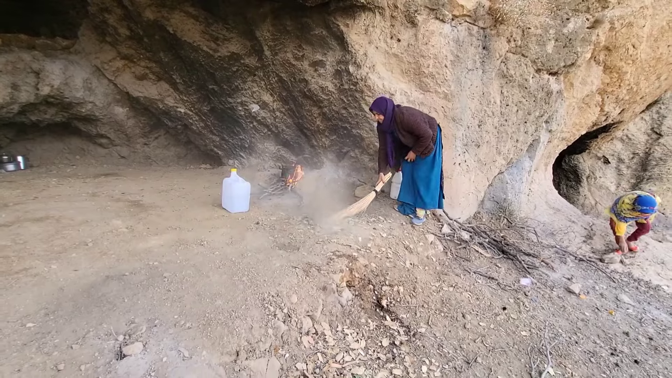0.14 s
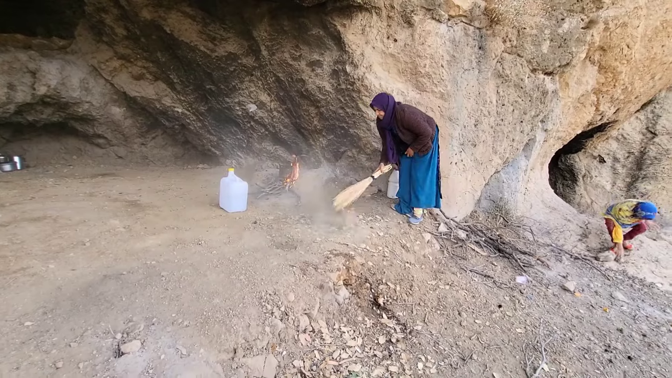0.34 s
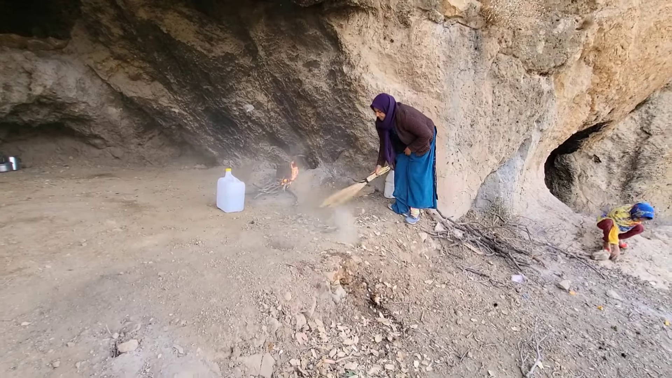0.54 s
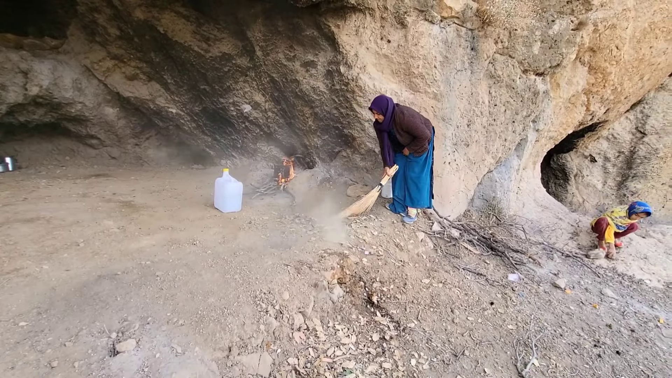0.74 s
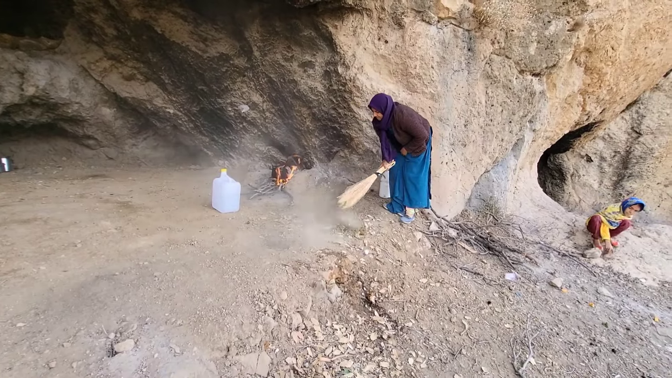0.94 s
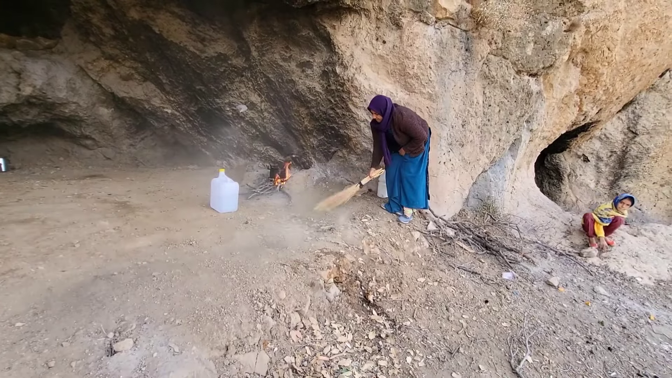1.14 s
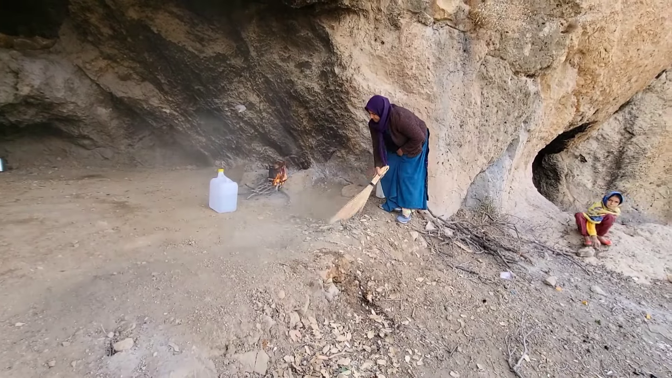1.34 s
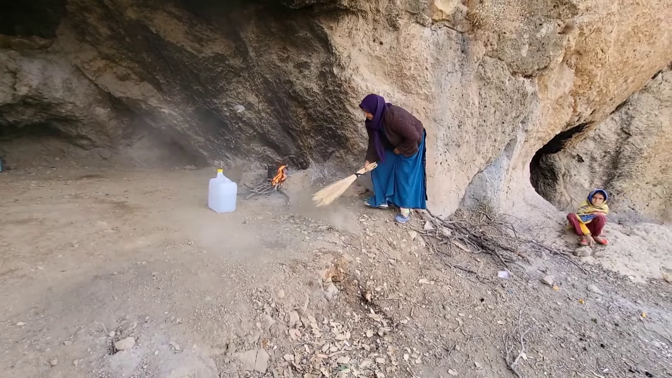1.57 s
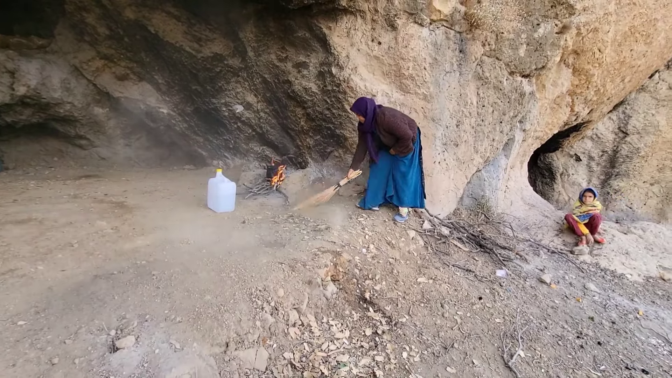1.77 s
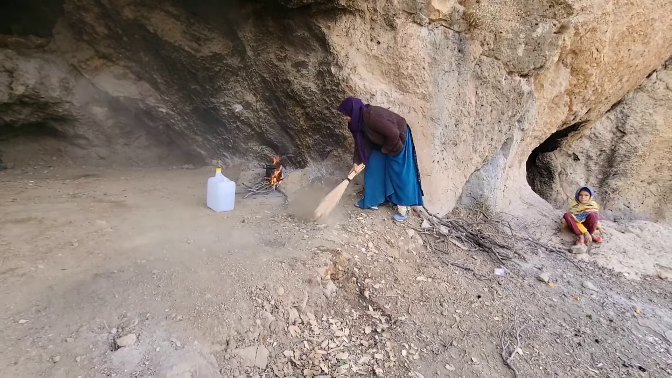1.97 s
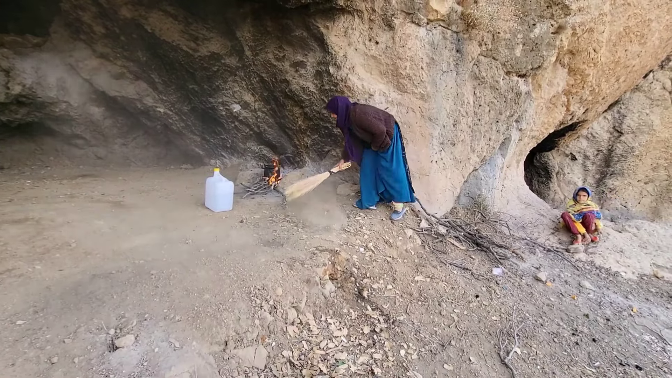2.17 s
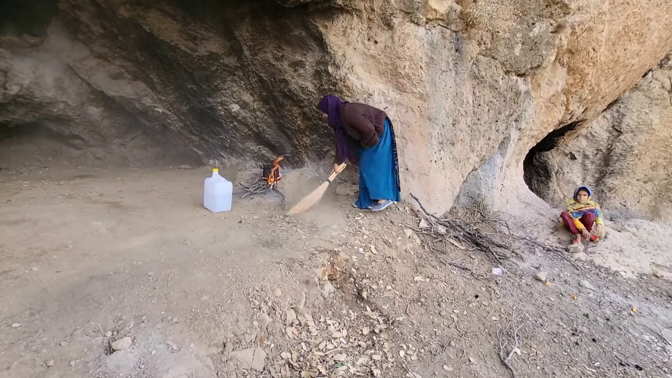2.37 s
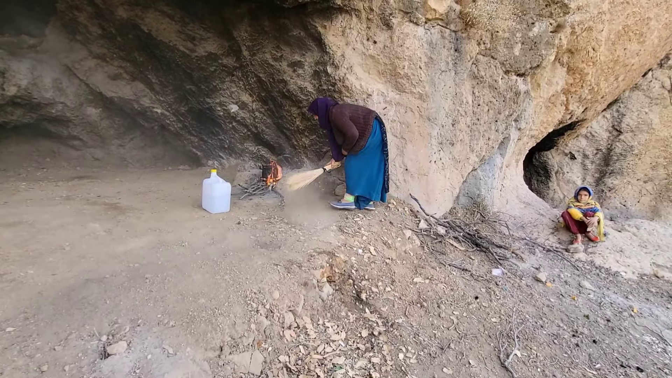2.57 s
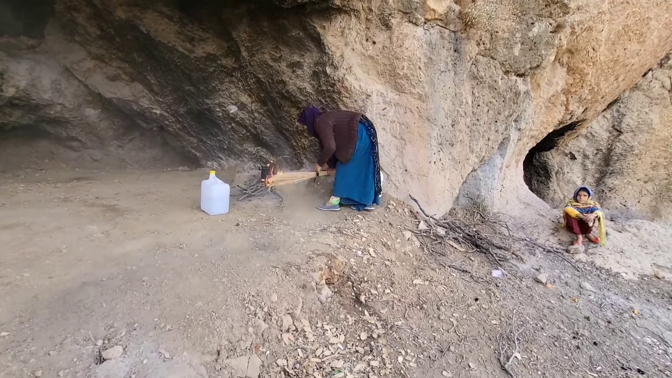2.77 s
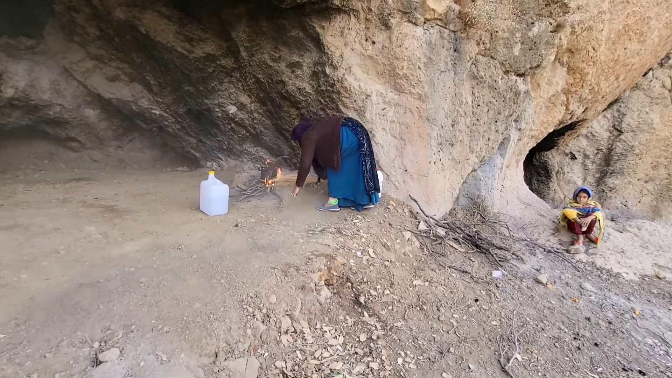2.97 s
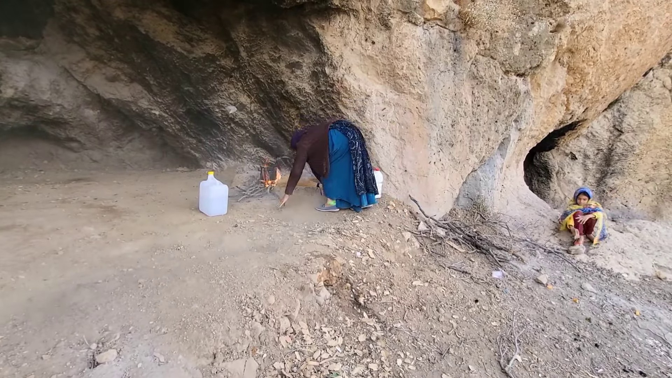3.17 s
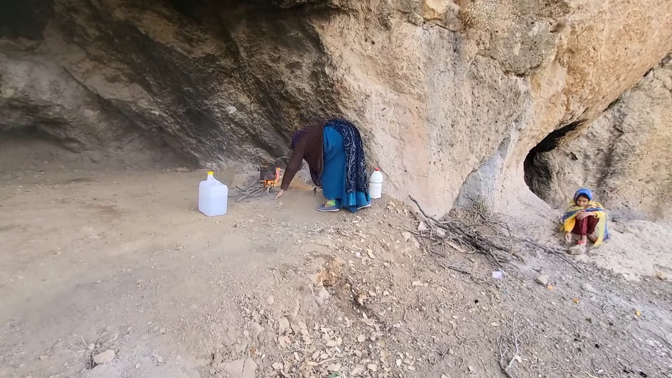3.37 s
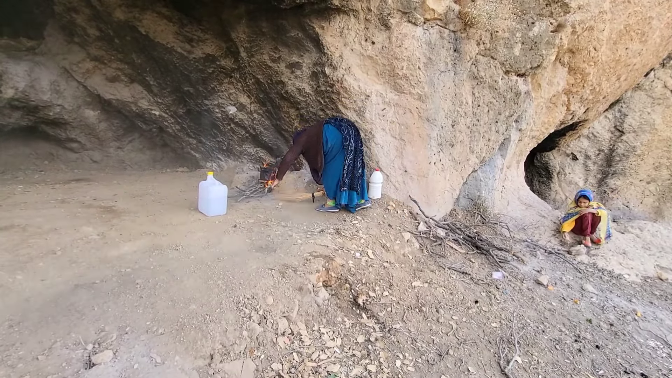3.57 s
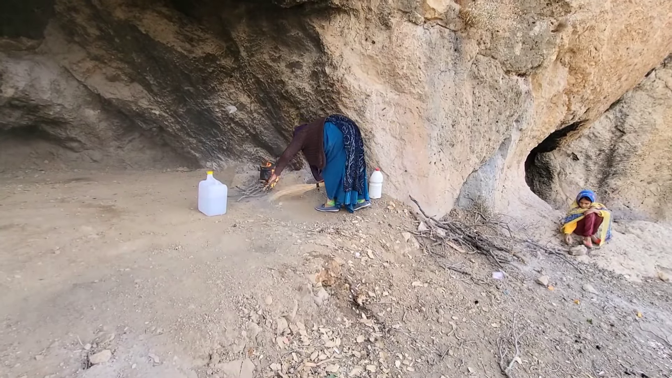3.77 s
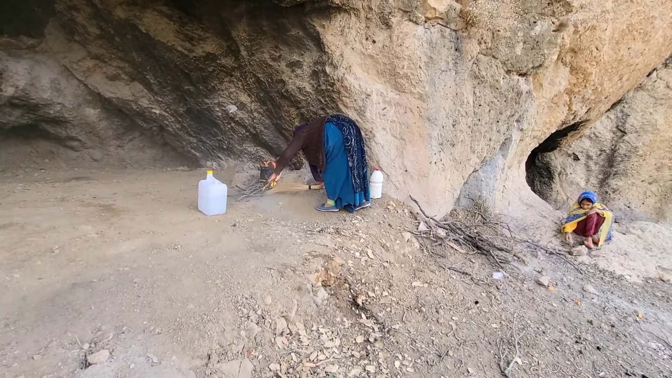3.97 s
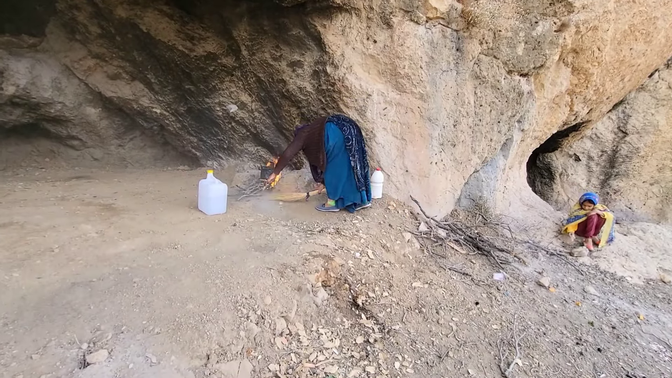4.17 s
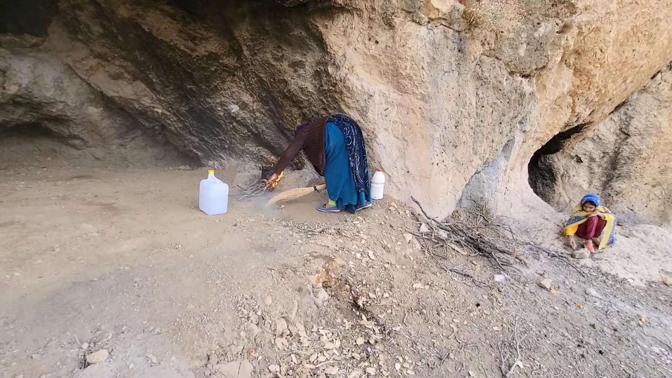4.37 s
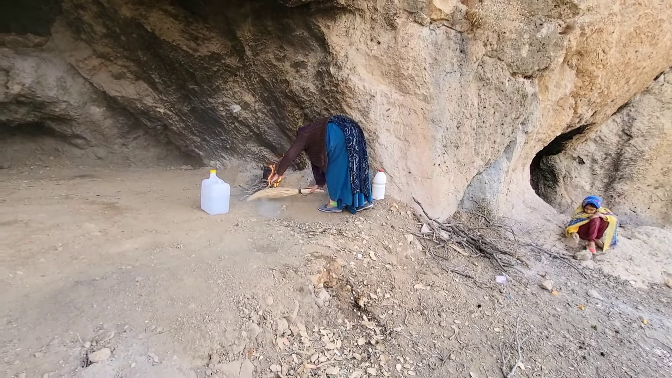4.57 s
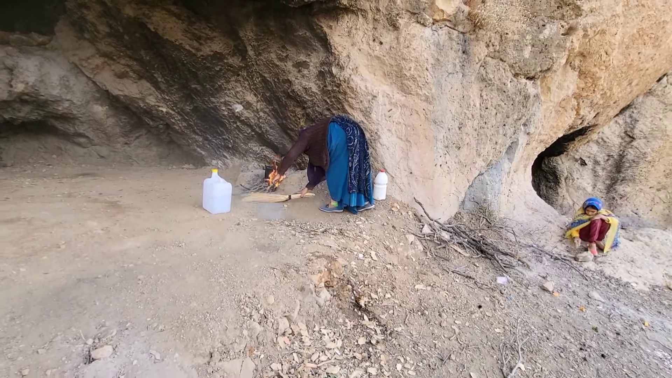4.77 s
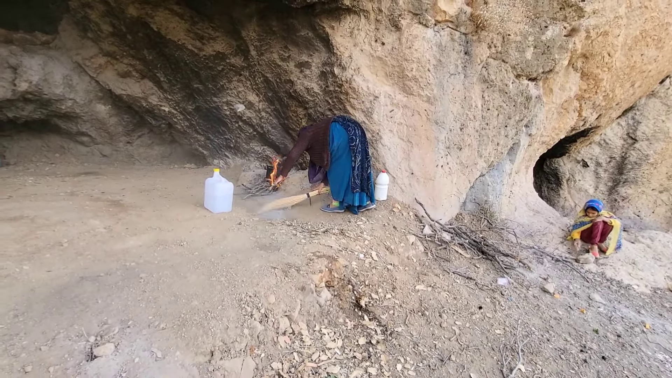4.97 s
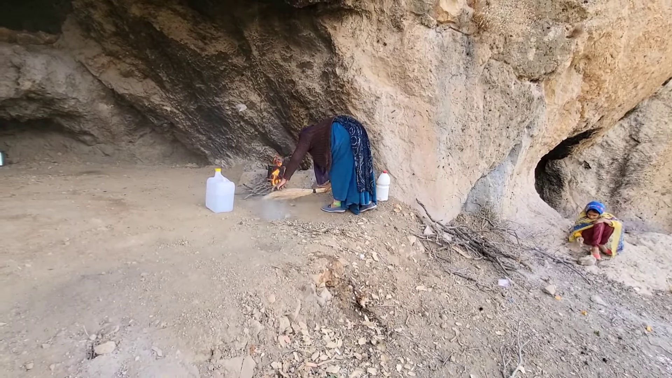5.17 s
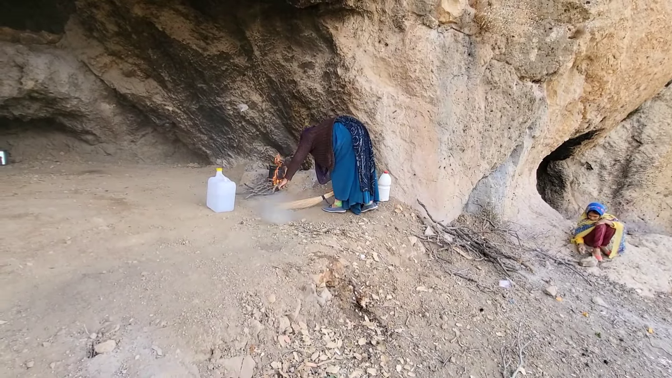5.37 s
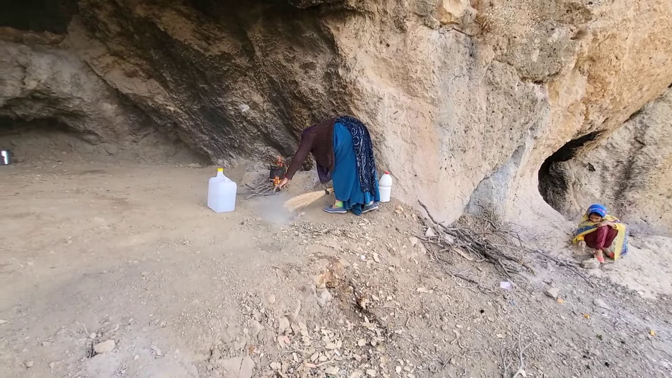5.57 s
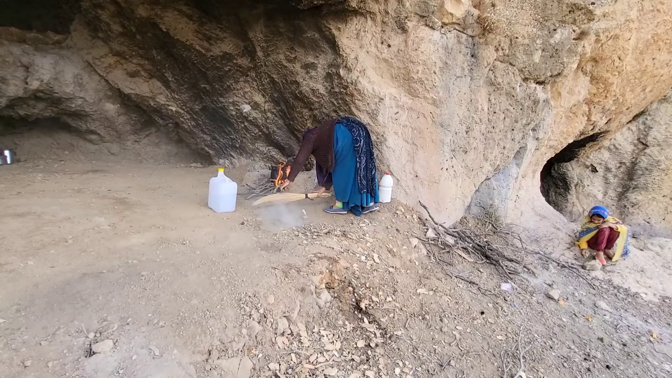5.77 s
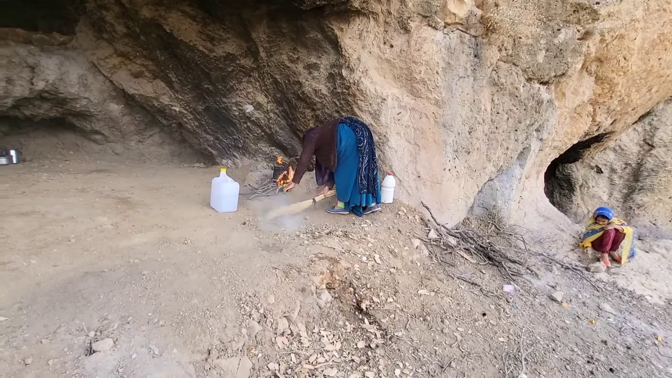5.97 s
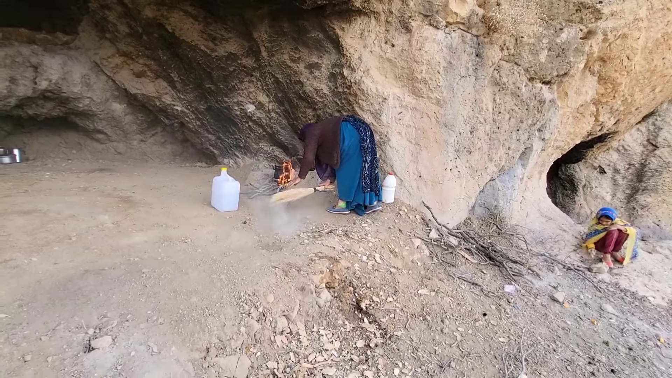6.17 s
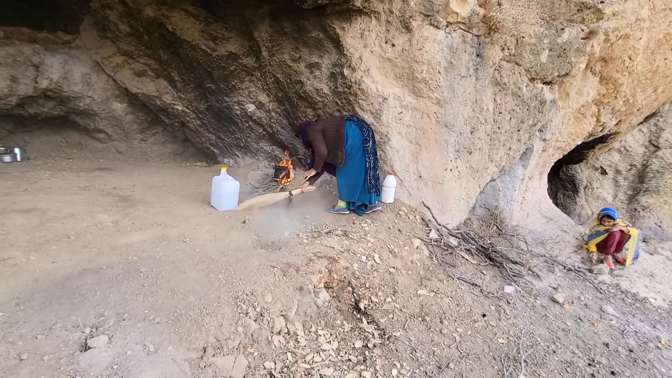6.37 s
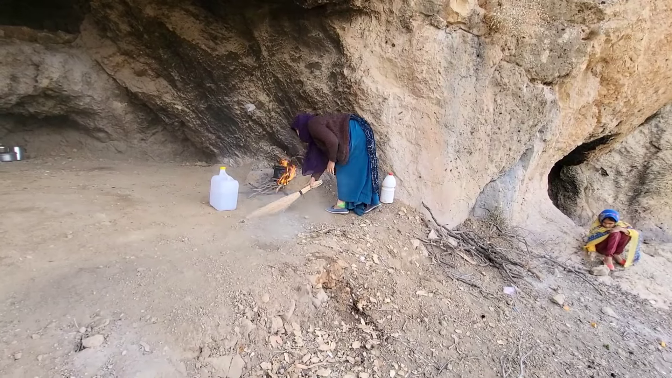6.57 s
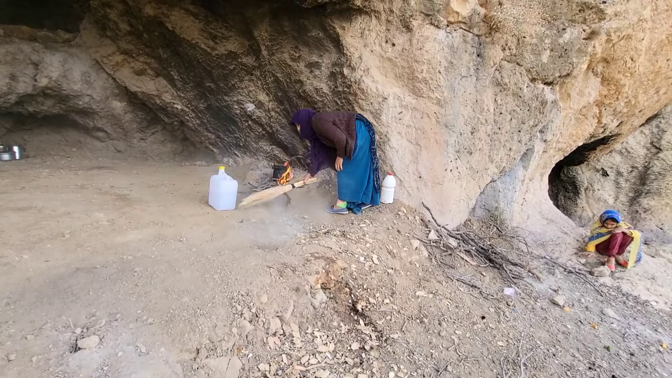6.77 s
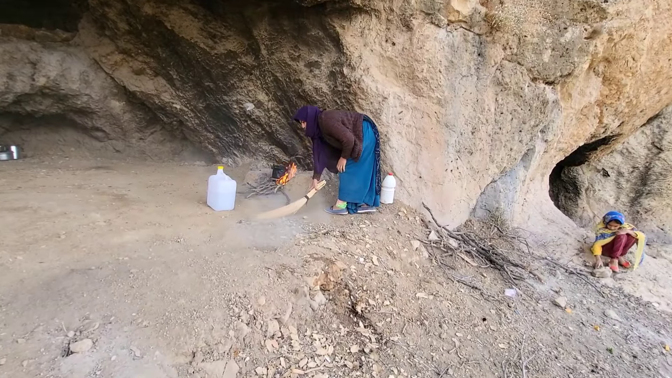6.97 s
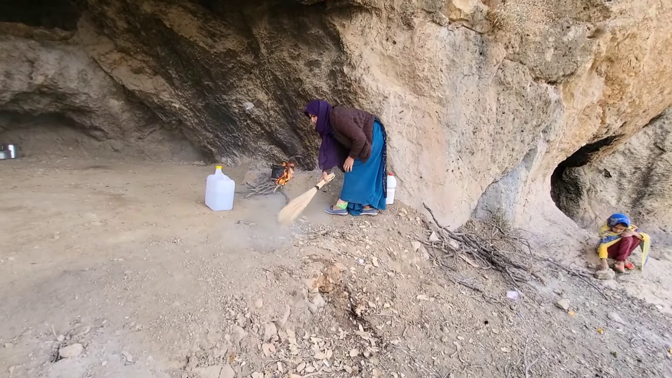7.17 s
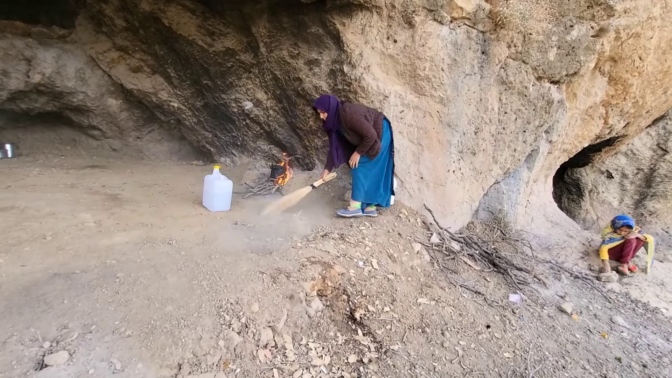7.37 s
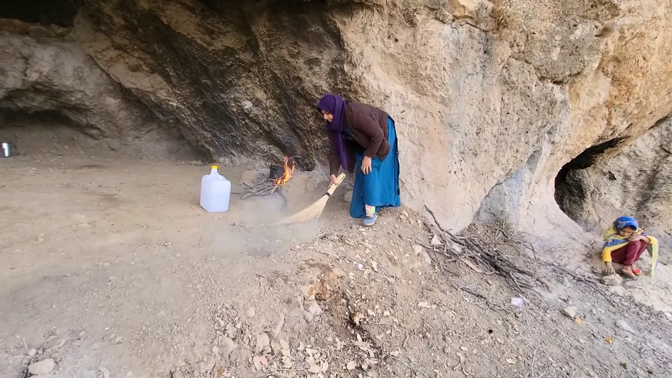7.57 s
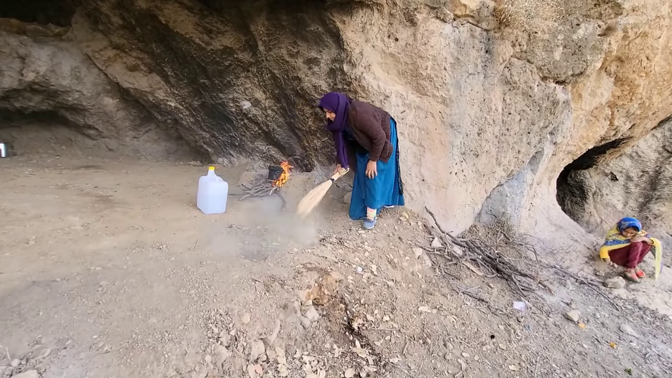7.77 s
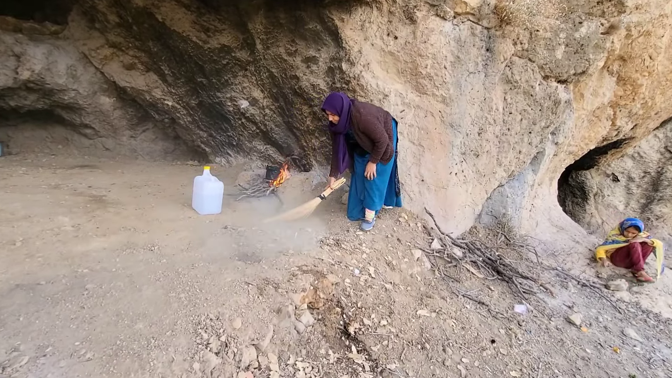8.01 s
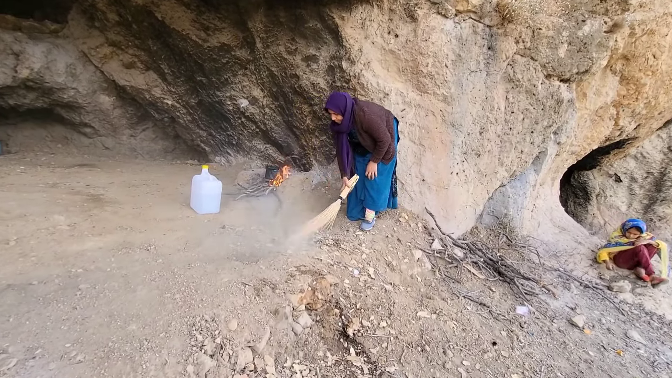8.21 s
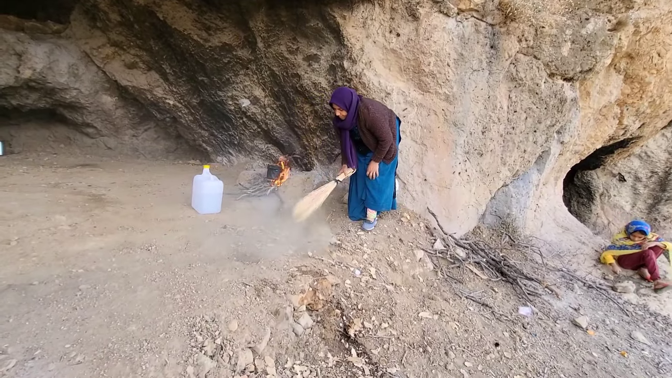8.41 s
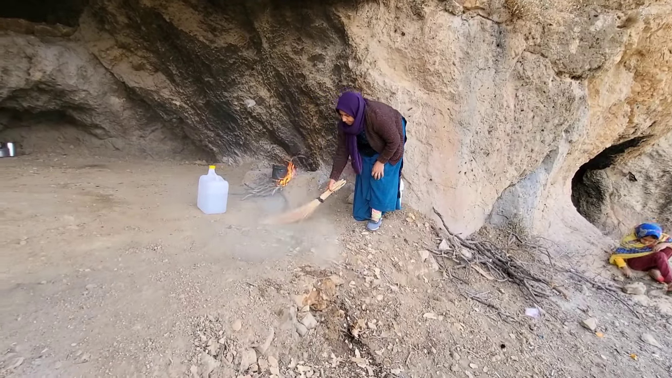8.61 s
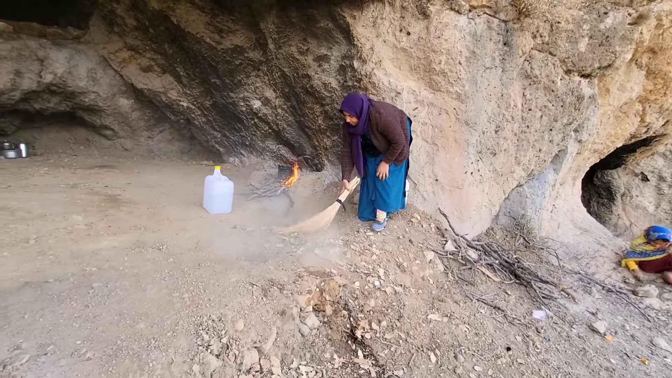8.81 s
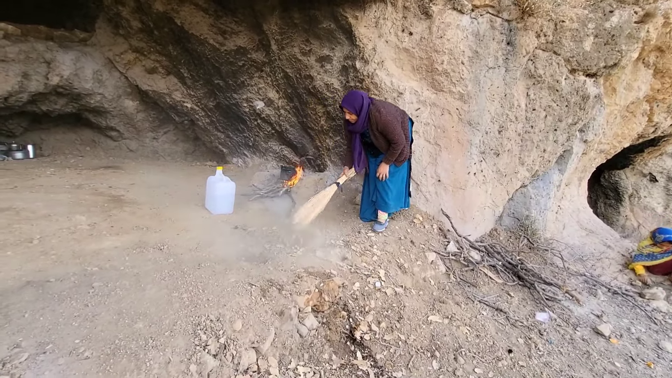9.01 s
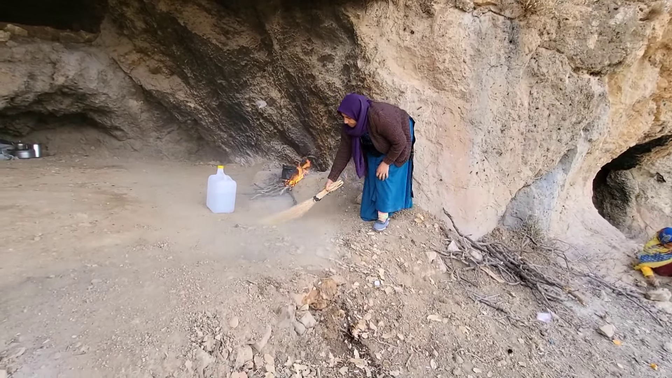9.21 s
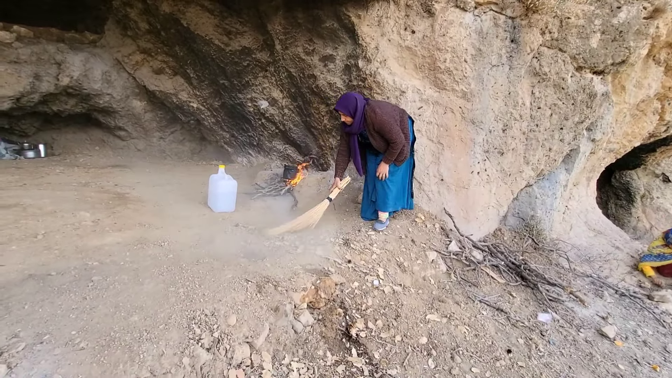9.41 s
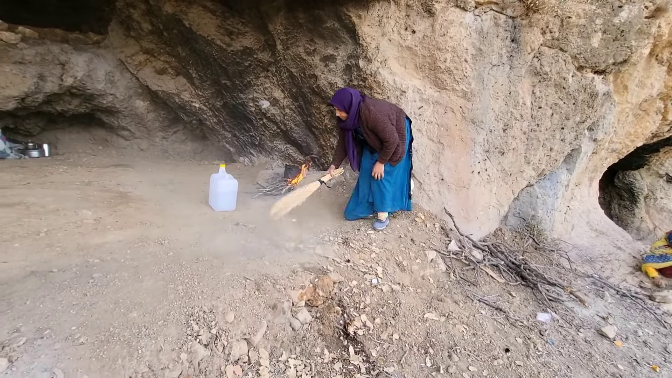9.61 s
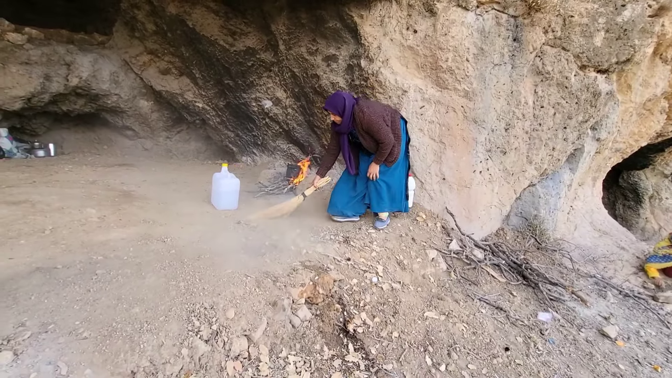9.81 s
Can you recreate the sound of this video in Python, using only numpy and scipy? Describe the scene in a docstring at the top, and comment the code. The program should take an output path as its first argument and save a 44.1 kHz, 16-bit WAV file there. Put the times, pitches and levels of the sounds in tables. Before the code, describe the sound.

A straw broom sweeps dusty gravelly ground in brisk scratchy strokes, pebbles clicking, with a quieter lighter middle and one hollow knock.

```python
"""Straw broom under a rock overhang

A straw broom sweeps dusty, gravelly ground: friction makes a juddering hiss, scrape and low drag,
built from random impacts through filters. Pebbles click as brief pings, stiff straws rasp through
resonators, feet shuffle in bursts of grains, and a hollow body is knocked and rings in a few modes.
The rock returns filtered reflections; a light breeze and jolts reach the microphone as shaped noise
and decaying tones."""
import sys
import numpy as np
from scipy import signal
from scipy.io import wavfile

SR = 44100
rng = np.random.default_rng(int(sys.argv[2]) if len(sys.argv) > 2 else 0)


def wrap_up_sound(samples):
    """Save the sound to the file named by the first command line argument, as 16-bit audio."""
    columns = np.atleast_2d(samples).T
    # keep every value between -1 and 1, then stretch to whole-number steps
    tamed = np.clip(columns, -1, 1)
    steps = np.round(tamed * 32767).astype(np.int16)
    wavfile.write(sys.argv[1], SR, steps)


N = 434385
TIME = np.arange(N) / SR


def gain_of(db):
    """Level to amplitude: 20 dB is a factor of ten."""
    return 10 ** (np.asarray(db) / 20)


def evened(x):
    """Normalization: scales a signal to an rms of one over all its channels."""
    return x / np.sqrt(np.mean(x ** 2) + 1e-20)


def read(points, hz):
    """Interpolation: reads a table of values on a logarithmic frequency axis."""
    f, value = np.transpose(points)
    return np.interp(np.log(hz + 1), np.log(f + 1), value)


def add(mix, s, sound):
    """Superposition: adds a sound into the mix from time s, cut at the end."""
    part = mix[:, max(round(s * SR), 0):][:, :sound.shape[-1]]
    part += sound[..., :part.shape[1]]


def panned(db):
    """Interchannel level difference: left and right gains, positive to the left."""
    return gain_of(np.array([[db / 2], [-db / 2]]))


def coloured(x, spectrum):
    """Minimum-phase filtering: the spectrum fixes a causal response, here of unit energy."""
    hz = abs(np.fft.fftfreq(4096, 1 / SR))
    log_gain = np.log(gain_of(read(spectrum, hz)))
    # the Hilbert transform of the log gain supplies the phase
    taps = np.fft.ifft(np.exp(np.conj(signal.hilbert(log_gain)))).real
    taps = taps / np.linalg.norm(taps)
    return signal.oaconvolve(x, taps[None], axes=1)[:, :x.shape[1]]


def paired(x, likeness):
    """Interchannel correlation: mixes two unrelated channels until partly alike."""
    c = np.clip(likeness, -1, 1)
    return np.array([x[0], c * x[0] + np.sqrt(1 - c * c) * x[1]])


def wander(per_s):
    """Slow random modulation: joins random knots by straight lines, with an rms of one."""
    knots = rng.standard_normal(8192)
    return evened(np.interp(TIME * per_s, np.arange(len(knots)), knots))


def crackle(per_s, spread_db):
    """Shot noise: tiny impacts of unequal size, each with its own strength in either channel."""
    size = gain_of(spread_db * np.minimum(rng.exponential(1, N), 6))
    hits = size * (rng.random(N) < per_s / SR)
    return evened(hits * rng.standard_normal((2, N)))


def slips(per_s, spread_db, t60):
    """Stick-slip: straws spring free at random and the energy decays exponentially; rms one."""
    size = gain_of(spread_db * np.minimum(rng.exponential(1, N), 3))
    kicks = size * (rng.random(N) < per_s / SR)
    decay = np.exp(-2 * np.log(1000) / (t60 * SR))
    return evened(np.sqrt(signal.lfilter([1], [1, -decay], kicks ** 2)))


def resonant(x, hz, sharpness):
    """Resonance: a straw favours a broad band about one frequency; rms one."""
    return evened(signal.lfilter(*signal.iirpeak(hz, max(sharpness, .6), fs=SR), x))


# spectrum of the open air: f/Hz, relative level/dB
AIR_SPECTRUM = [(30, -5.5), (120, 2.5), (250, -8), (400, -19), (700, -20), (1000, -30), (2200, -27),
                (2600, -18.5), (3000, -56), (4000, -30), (4750, -16), (5600, -28), (9000, -31),
                (15500, -29)]


def open_air():
    """Stationary noise: faint, steady air, partly alike in the two channels."""
    noise = paired(rng.standard_normal((2, N)), likeness=.55)
    return gain_of(-68) * coloured(noise, AIR_SPECTRUM)


# breeze on the microphone: t/s, relative level/dB
BREEZE_LEVEL = [(0, -69.5), (2.4, -67), (2.85, -62), (3.2, -68), (3.88, -65), (4.06, -55), (4.74, -68),
                (4.89, -60.5), (5.42, -52.5), (5.6, -66.5), (6.24, -54.5), (7.0, -65), (7.92, -56),
                (8.46, -64.5), (9.85, -61)]
# spectrum of the wind pressure: f/Hz, relative level/dB
BUFFET_SPECTRUM = [(15, -41), (28, -22), (42, -1), (62, 3.5), (100, -3), (150, -12), (250, -18.5),
                   (500, -49.5), (1200, -76)]


def breeze(drag_force):
    """Turbulent pressure: lumpy low noise, stronger at the left; it also follows the drag force."""
    wind = gain_of(np.interp(TIME, *np.transpose(BREEZE_LEVEL)))
    rumble = gain_of(-6.5) * drag_force  # low rumble that rises and falls with the strokes
    level = np.hypot(wind, rumble)  # unrelated powers add
    flutter = gain_of(3.2 * wander(per_s=18))
    lumps = coloured(paired(rng.standard_normal((2, N)), likeness=.55), BUFFET_SPECTRUM)
    return lumps * level * gain_of(2.5) * flutter * panned(db=3.0)


# jolts of the microphone: t/s, relative thud level/dB, f/Hz, thud t60/s, relative clack level/dB
JOLTS = [(4.4988, -27.5, 79, 0.11, -12), (4.5155, -38.5, 100, 0.072, -19), (4.897, -38.5, 56.6, 0.23, -55),
         (5.019, -42, 53, 0.21, -49), (5.731, -42, 62, 0.096, -51), (7.903, -42, 62, 0.35, -48),
         (8.014, -49, 63, 0.26, -50)]
# spectrum of the microphone's case: f/Hz, relative level/dB
CASE_SPECTRUM = [(60, 2), (150, 18.5), (320, 9.5), (520, 4), (850, -10), (1500, -10), (2200, -6.5),
                 (3200, -12), (6000, -9), (15000, -25)]


def bumps():
    """Damped oscillation: a jolt rocks the microphone at a low pitch and makes its case clack."""
    out, t = np.zeros((2, N)), np.arange(SR // 4) / SR
    for s, thud_db, hz, t60, clack_db in JOLTS:
        thud = np.sin(2 * np.pi * hz * t) * gain_of(thud_db - 60 * t / t60)
        contact = rng.standard_normal((2, len(t))) * gain_of(-25 - 60 * t / 0.078)
        contact[:, 0] = -1
        clack = gain_of(clack_db) * coloured(contact, CASE_SPECTRUM)
        add(out, s, (thud + clack) * panned(db=14))
    return out


# reverberation time of the rock: f/Hz, t60/s
ROCK_DECAY = [(150, 0.5), (600, 0.18), (2500, 0.25), (6000, 0.18), (15000, 0.25)]


def rock_tail():
    """Reverberant decay: random reflections swell in from the uneven rock; the lows last longest."""
    length = SR // 2
    signs = rng.choice([-1., 1.], (2, length))
    taps = signs * (rng.random((2, length)) < 5000 / SR)
    onset = np.interp(TIME[:length], [.009, .014, .022, .035], [0, 1, 0.22, 0.36])
    taps = paired(taps, likeness=0.11) * onset
    hz, t, z = signal.stft(taps, SR, nperseg=256)
    decay = gain_of(-60 * t / read(ROCK_DECAY, hz)[:, None])
    tail = signal.istft(z * decay, SR)[1]
    return tail / np.linalg.norm(tail[0])


def overhang(x):
    """Time-varying reflection: two patterns share the sound by turns as the broom travels."""
    place = 2 * np.pi * 2.4 * TIME  # cycles at 2.4 Hz
    out = np.zeros((2, N))
    for share in (np.cos(place), np.sin(place)):
        out += signal.oaconvolve(x * share, rock_tail(), axes=1)[:, :N]
    return out


# feet shifting on packed earth: t/s, level/dB, length/s (the peak comes after a third of it)
FOOT_SHUFFLES = [(2.614, -49.5, 0.025), (2.723, -59, 0.031), (4.281, -61, 0.03), (4.827, -60, 0.045),
                 (5.916, -53, 0.12), (6.206, -49.5, 0.058), (6.243, -55, 0.068)]
# spectrum of the earth: f/Hz, relative level/dB
EARTH_SPECTRUM = [(40, -30), (120, 5), (220, -2), (330, -4.5), (420, -16), (520, -6.5), (720, -6.5),
                  (900, -19.5), (1300, -26), (3000, -47), (9000, -60)]


def shuffles():
    """Granular friction: soles scuff the earth in dull bursts of grains that swell and fade."""
    force = np.zeros(N)
    for s, db, length in FOOT_SHUFFLES:
        u = np.maximum(TIME - s, 0) / length * 3
        force += gain_of(db) * u * np.exp(1 - u)
    grains = paired(crackle(per_s=2100, spread_db=1.0), likeness=0.9)
    return force * coloured(grains, EARTH_SPECTRUM)


# blows of one rattling knock on a hollow thing: t/s, relative level/dB
BLOWS = [(6.7412, -36), (6.7478, -16), (6.7556, -27), (6.7897, -33.5)]
# spectrum of the clatter: f/Hz, relative level/dB
CLATTER_SPECTRUM = [(100, -17), (260, 1), (400, -1), (520, 7), (800, -1.5), (1150, -3.5), (1550, -11),
                    (2100, -5.5), (2800, 1), (4000, -7), (5000, -11.5), (6200, -18.5), (15000, -24)]
# modes of the hollow body: f/Hz, relative level/dB, t60/s
HOLLOW_MODES = [(524, 0, .21), (785, -8, .26), (1207, -11, .2), (2615, -7, .17)]


def knock():
    """Modal vibration: each blow cracks and clatters; the hardest also rings the body's modes."""
    out, t = np.zeros((2, N)), np.arange(SR // 2) / SR
    ring = np.zeros(len(t))
    for hz, db, t60 in HOLLOW_MODES:
        ring += gain_of(db - 60 * t / t60) * np.sin(2 * np.pi * hz * t)
    hardest = max(BLOWS, key=lambda blow: blow[1])
    add(out, hardest[0], gain_of(-35) * ring)
    for s, db in BLOWS:
        clatter = paired(rng.standard_normal((2, len(t))), likeness=0.18)
        clatter *= gain_of(-11.0 - 60 * t / 0.14)
        clatter[:, 0] += gain_of(10.0)  # the crack
        add(out, s, gain_of(db) * coloured(clatter, CLATTER_SPECTRUM))
    return out


# spectrum of a dry contact: f/Hz, relative level/dB
SNAP_SPECTRUM = [(300, -19), (1100, -4.5), (2600, -1), (4200, 3.5), (5400, 7), (6600, 4), (8200, 7),
                 (10000, 1.5), (15500, 3)]


def click(hz, ring):
    """Impact: one stone or straw gives a dry snap and a brief ping, doubled by a ground bounce."""
    t = np.arange(2048) / SR
    contact = paired(rng.standard_normal((2, len(t))), likeness=0.12) * gain_of(-60 * t / 0.019)
    contact[:, 0] = 5
    snap = coloured(contact, SNAP_SPECTRUM)
    phase = rng.normal(0, .45, (2, 1))
    ping = np.sin(2 * np.pi * hz * t + phase) * gain_of(-60 * t / .0085)
    ring = np.clip(ring, 0, 1)
    direct = np.sqrt(1 - ring ** 2) * snap / abs(snap).max() + ring * ping
    bounce = np.roll(direct, round(SR * rng.uniform(.0015, .003)), axis=1)
    return direct + .3 * bounce


# clicking pebbles and stiff straws: t/s, relative level/dB, f/Hz, left-right level/dB,
# ring/1 (0 a dry snap, 1 a clear ping)
PEBBLE_CLICKS = [ (.027, -22.5, 2223, 11.5, 0.26), (.0784, -21, 8500, 10, 0.17), (.279, -23.5, 8300, 2, .1),
                 (.371, -29, 3650, -2, 0.7), (.452, -27.5, 3700, -3, 0.94), (.546, -29, 2520, 6, 0.36),
                 (.677, -28, 4170, 1, .8), (.7736, -15, 5200, 1, .15), (1.026, -22.5, 3280, 9, 0.3),
                 (1.116, -26, 2600, 3, 0.33), (1.1757, -24, 5440, -1, 0.17), (1.687, -23, 5360, 2, .5),
                 (1.7472, -24, 4420, -1, 1), (2.1675, -29, 2200, 9, .3), (2.3314, -13, 5130, 2, 0.16),
                 (2.504, -26, 5250, 2, .15), (2.5515, -20, 5120, 2, 0.64), (2.593, -24, 5120, 7, .2),
                 (2.7219, -19, 7750, 3, 0.05), (2.835, -29.5, 5330, 2, 0.64), (2.8755, -37, 8500, 3, 0.4),
                 (2.912, -39, 5060, 4, 0.7), (3.007, -33.5, 8200, 3, 0.1), (3.254, -36, 8000, 6, 0),
                 (3.911, -44, 1900, 11, 0.64), (4.637, -37, 5400, 0, 0.45), (6.33, -34, 8200, 2, .05),
                 (6.858, -23.5, 7940, 6, 0.1), (7.187, -24.5, 1630, 0, 0.5), (7.2226, -20, 8200, 3, .4),
                 (7.499, -21.5, 8400, 4, 0.36), (7.8816, -21.5, 8200, 0, 0), (7.9258, -30, 5430, -3.5, .8),
                 (7.959, -25, 8200, 6, 0), (8.0032, -17, 5100, 3, 0.14), (8.125, -24.5, 1940, -1, 0.6),
                 (8.4714, -27, 8230, -1, 0), (8.502, -17, 5730, 3, 0), (8.5437, -24, 5460, -1, 0.4),
                 (8.671, -16.5, 4780, 1, 0), (8.7925, -19, 5070, -3, 0.4), (8.9866, -18, 5600, -1, 0.36),
                 (9.081, -16, 5410, 4, 0.64), (9.1358, -21.5, 5900, -2, 0.62), (9.2207, -19, 3940, 2, 0.27),
                 (9.6253, -20, 5550, 0, 0.43), (9.6902, -20.5, 4730, 2, 0.33), (9.8261, -23, 1620, -1, 0.3)]


def pebbles():
    """Separate impacts: larger stones that the broom flicks away, and straws that snap free."""
    out = np.zeros((2, N))
    for s, db, hz, pan_db, ring in PEBBLE_CLICKS:
        add(out, s, gain_of(db - 3.5) * panned(pan_db) * click(hz, ring))
    return out


def gravel(per_s, spread_db, count=22):
    """Random collisions: loose stones of many pitches each click at chance moments; rms one."""
    out = np.zeros((2, N))
    for hz in np.geomspace(2000, 7000, count):
        size = gain_of(spread_db * np.minimum(rng.exponential(1, N), 3.5))
        hits = size * (rng.random(N) < per_s / count / SR)
        out += signal.oaconvolve(hits[None], click(hz, ring=0.29), axes=1)[:, :N]
    return evened(out)


# stiff straws raking over a stone: t/s, relative level/dB, f/Hz, t60/s
STRAW_RASPS = [ (.3595, -43.5, 4300, 0.074), (.462, -44, 3600, 0.094), (0.729, -40, 4480, 0.12),
               (.774, -41.5, 5000, .09), (1.064, -37.5, 3470, 0.043), (1.591, -42, 3660, 0.037),
               (1.758, -48, 4470, .07), (2.167, -42.5, 2900, 0.035), (2.631, -49, 1240, .05),
               (2.915, -57.5, 4470, 0.17), (7.655, -43, 3000, 0.17), (7.925, -37, 5300, 0.033),
               (8.5432, -41, 5340, .035), (8.792, -38, 6000, .025), (9.551, -40.5, 5400, .055),
               (9.624, -40, 3040, 0.027), (9.8259, -35.5, 2430, 0.014)]


def rasps():
    """Excited resonance: a stiff straw chatters over a stone in one short, decaying spurt."""
    out, t = np.zeros((2, N)), np.arange(SR // 6) / SR
    for s, db, hz, t60 in STRAW_RASPS:
        chatter = rng.standard_normal((2, len(t))) * (rng.random(len(t)) < 4000 / SR)
        rasp = resonant(chatter, hz, sharpness=3.2)
        add(out, s, rasp * gain_of(db + 4 - 60 * t / t60))
    return out


def scratches(count=8):
    """Resonant stick-slip: thick and thin straws scratch in spurts at their own pitch; rms one."""
    spurts = np.zeros((2, N))
    for hz in np.geomspace(1500, 6000, count):
        straw = resonant(crackle(per_s=2500, spread_db=1.5), hz, sharpness=2.2)
        spurts += straw * slips(per_s=35, spread_db=2.5, t60=0.12)
    return evened(spurts)


SWELL_DB = 10  # a stroke gains this much over its swell time
LIFT_DB_PER_S = 91.5  # everything fades as the broom leaves the ground

# strokes and lighter return drags: t/s at full pressure, swell/s, hold/s,
# then relative level/dB of the tips' hiss, of the grit's scrape and of the pressed bundle's drag
BROOM_STROKES = [ (0.194, 0.14, 0.023, -42, -40.5, -52), (0.359, 0.12, 0.13, -57, -47.5, -58),
                 (0.765, .16, 0.067, -44, -41, -53.5), (1.056, .11, 0.054, -54, -46, -62.5),
                 (1.321, 0.13, 0.063, -44.5, -44.5, -58.5), (1.631, 0.15, 0.042, -50.5, -46, -66.5),
                 (1.885, 0.13, 0.18, -44, -45.5, -58.5), (2.17, .05, .13, -70, -55, -68),
                 (2.341, 0.11, .12, -48.5, -51.5, -64.5), (2.565, 0.036, 0.12, -60, -54, -65.5),
                 (2.782, 0.021, 0.042, -64.5, -62.5, -88), (3.176, 0.033, .08, -74, -70.5, -89),
                 (3.448, 0.11, .05, -65, -84, -85), (3.526, 0.03, 0.048, -45.5, -59.5, -70),
                 (3.594, 0.054, 0.044, -56, -51, -66.5), (3.726, .1, 0.067, -61, -64.5, -80),
                 (4.097, 0.072, 0.052, -47, -55.5, -73), (4.233, 0.13, .11, -53, -55.5, -72.5),
                 (4.732, .036, .09, -54, -64, -85), (4.904, 0.095, 0.14, -48.5, -52.5, -62.5),
                 (5.177, 0.034, 0.13, -54, -63, -86), (5.308, .055, 0.29, -50, -51.5, -63),
                 (5.733, .2, 0.061, -57, -58, -73), (5.946, 0.058, 0.076, -43, -49.5, -57.5),
                 (6.206, 0.099, 0.027, -59, -52, -64.5), (6.406, 0.054, .03, -57, -65, -84),
                 (6.51, 0.077, 0.047, -48, -54, -63), (6.945, 0.12, 0.089, -45.5, -49.5, -61),
                 (7.031, 0.063, .19, -45.5, -45.5, -58.5), (7.32, .055, .092, -57.5, -53, -69),
                 (7.518, 0.057, 0.25, -42, -42, -54), (8.028, .035, 0.15, -47.5, -59, -61.5),
                 (8.213, 0.15, .095, -41, -38, -53), (8.454, .042, 0.08, -60, -52, -70),
                 (8.649, 0.11, 0.12, -43.5, -45, -54.5), (8.918, 0.29, 0.045, -44, -42, -54.5),
                 (9.294, 0.11, 0.076, -46.5, -46, -61), (9.454, 0.14, 0.075, -43.5, -41.5, -53),
                 (9.604, .07, 0.1, -60, -52, -66), (9.84, 0.14, .03, -50.5, -52.5, -59.5)]


def pressure(column, lag_s, sag_db_per_s):
    """Force envelope: each stroke swells, holds while it sags, and lifts off; powers add."""
    t, power = TIME[::64], 0
    for s, swell_s, hold_s, *levels_db in BROOM_STROKES:
        age = t - s
        swell_db = SWELL_DB * np.minimum(age - lag_s, 0) / max(swell_s, 1e-2)
        sag_db = sag_db_per_s * np.maximum(age, 0)
        lift_db = LIFT_DB_PER_S * np.maximum(age - hold_s, 0)
        power = power + gain_of(levels_db[column] + swell_db - sag_db - lift_db) ** 2
    return np.interp(TIME, t, np.sqrt(power))


GRIT_LAG_S = 0.0098  # the tips touch first, then the grit starts to move
TIPS_SAG_DB_PER_S = 19.5  # the hiss fades as the straws bend and slow down
GRIT_SAG_DB_PER_S = 3.5  # the scrape holds while the broom is pressed down
UNEVEN_DB, UNEVEN_PER_S = 1.5, 28  # patches of more and less grit under the broom
FLICK_DB, FLICK_PER_S = 1.3, 40  # more or fewer straw tips touch the ground


def strokes():
    """Modulated contact force: the tips flick; grit and bundle follow the uneven ground."""
    ground = gain_of(UNEVEN_DB * wander(UNEVEN_PER_S))
    flick = gain_of(FLICK_DB * wander(FLICK_PER_S))
    tips = flick * pressure(0, 0, TIPS_SAG_DB_PER_S)
    grit = ground * pressure(1, GRIT_LAG_S, GRIT_SAG_DB_PER_S)
    drag = ground * pressure(2, GRIT_LAG_S, GRIT_SAG_DB_PER_S)
    return tips, grit, drag


# spectra of straw tips, grit and pressed bundle: f/Hz, relative level/dB
TIPS_SPECTRUM = [(1500, -57), (3500, -22), (5200, -8.5), (6500, -6), (8200, -1), (9900, -7), (11200, -5),
                 (12600, -1.5), (15500, -1.5)]
GRIT_SPECTRUM = [(500, -28), (1100, -18), (2000, -5), (3200, 2), (4400, 2), (5400, 6.5), (6500, -3),
                 (8200, -0.5), (9700, -18), (15500, -24)]
BUNDLE_SPECTRUM = [(60, -12.5), (150, 5), (280, 4.5), (390, -10), (540, 2), (720, 3), (900, -4.5),
                   (1200, 3), (1550, -7), (2200, -5), (4500, -33.5)]


def broom(tips_force, grit_force, drag_force):
    """Friction: straws catch and slip together, so one judder shakes the hiss, scrape and drag."""
    judder = slips(per_s=460, spread_db=2.0, t60=0.1)
    tips = coloured(paired(crackle(per_s=13000, spread_db=-1.0), likeness=-0.04), TIPS_SPECTRUM)
    grit = coloured(paired(crackle(per_s=5000, spread_db=-0.5), likeness=-0.029), GRIT_SPECTRUM)
    bundle = coloured(paired(crackle(per_s=3000, spread_db=2.5), likeness=0.93), BUNDLE_SPECTRUM)
    # single tips spring free
    ticks = coloured(paired(crackle(per_s=320, spread_db=1.0), likeness=.2), TIPS_SPECTRUM)
    hiss = judder * tips * gain_of(3.0) + ticks * gain_of(-10)
    scrape = judder * grit * gain_of(-3.0)
    scrape += scratches() * gain_of(-7.0)
    scrape += gravel(per_s=150, spread_db=2.5) * gain_of(-8.0)
    drag = judder * bundle * gain_of(-.5)
    out = hiss * tips_force * panned(db=2.0)
    out += scrape * grit_force * panned(db=0.75)
    return out + drag * drag_force * panned(db=1.4)


def scene():
    """Superposition: direct sounds, their reflections from the rock, air, breeze and bumps."""
    tips, grit, drag = strokes()
    sweep = broom(tips, grit, drag) + rasps()
    stones = pebbles()
    blows = knock() + shuffles()
    to_rock = gain_of(-8.5) * sweep + gain_of(-4) * stones + gain_of(-9) * blows
    return sweep + stones + blows + overhang(to_rock) + open_air() + breeze(drag) + bumps()


EDGE_HZ = 15800  # upper edge of the recorder's band


def record(dry):
    """Band limiting: a linear-phase low-pass filter stands for the recorder."""
    taps = signal.firwin(511, EDGE_HZ, window=("kaiser", 9), fs=SR)
    return signal.oaconvolve(dry, taps[None], "same")


dry = scene()
out = record(dry)
wrap_up_sound(out)
```